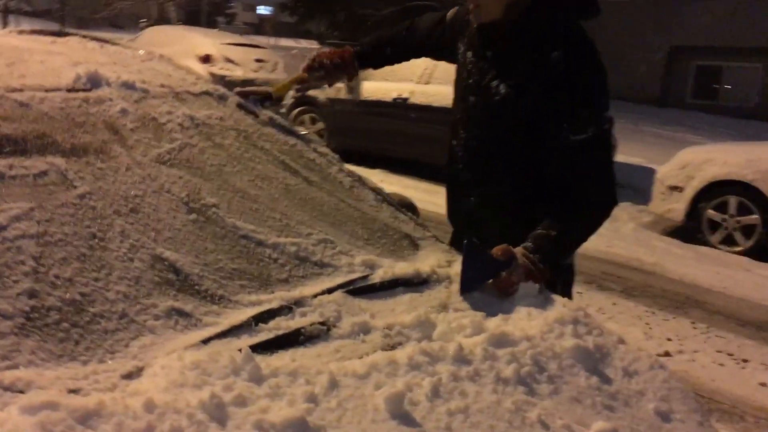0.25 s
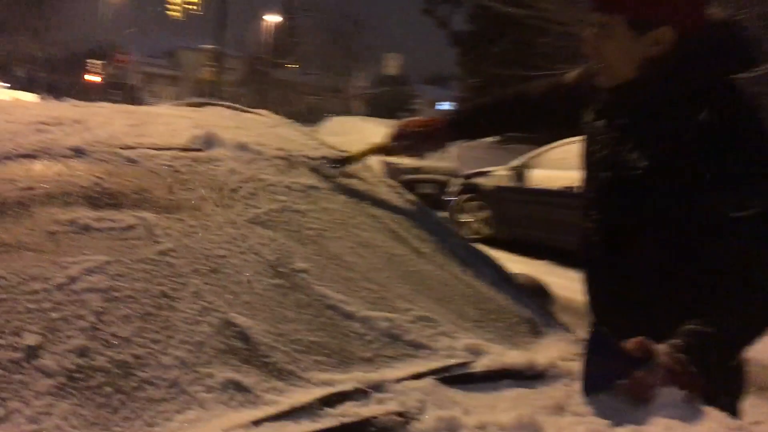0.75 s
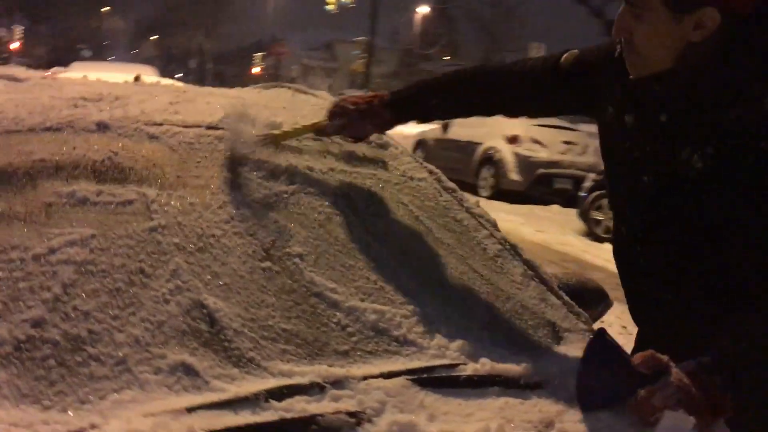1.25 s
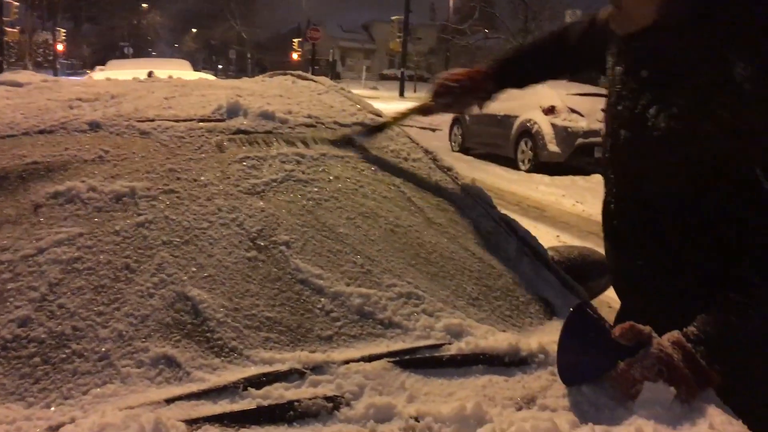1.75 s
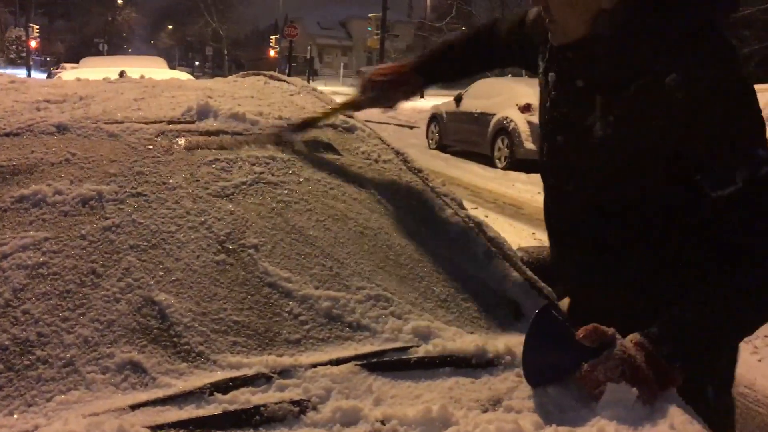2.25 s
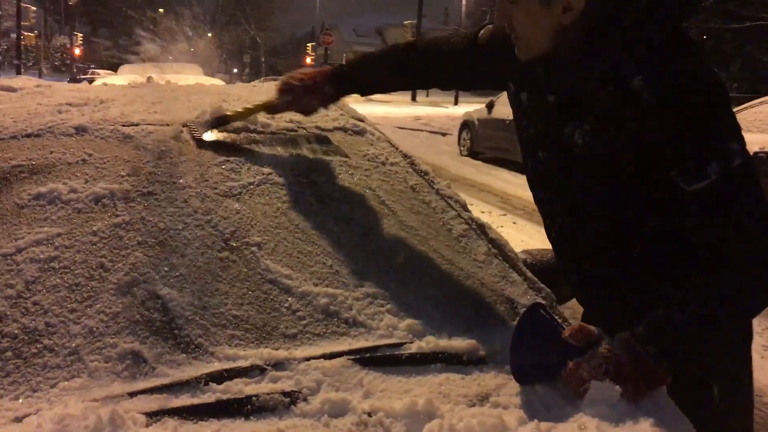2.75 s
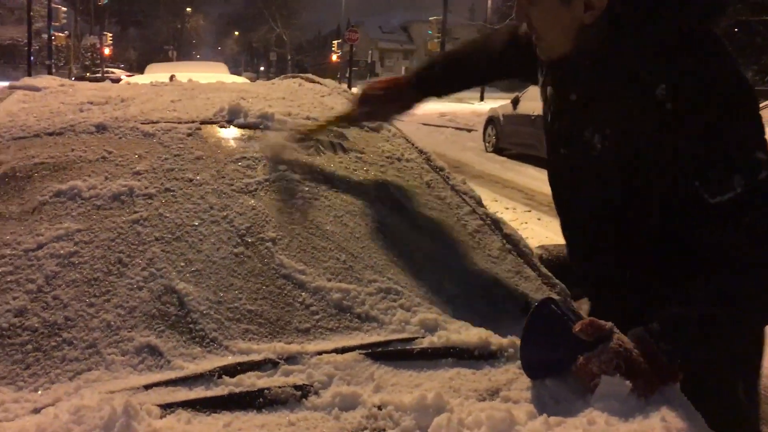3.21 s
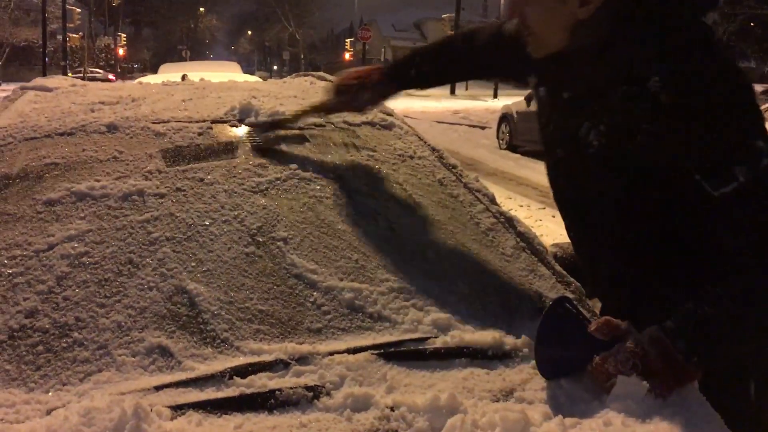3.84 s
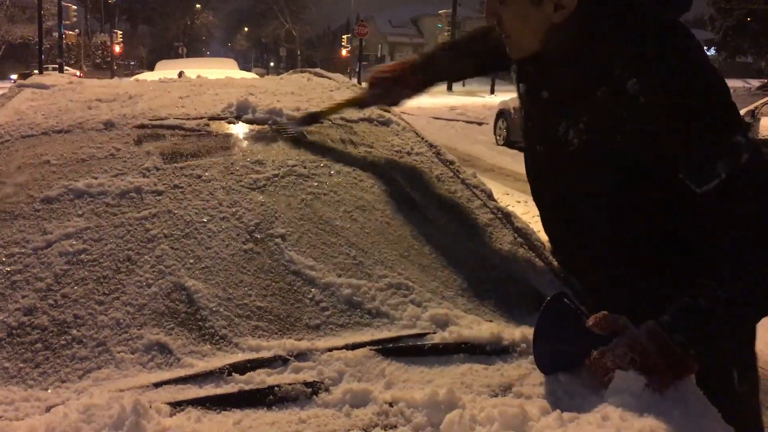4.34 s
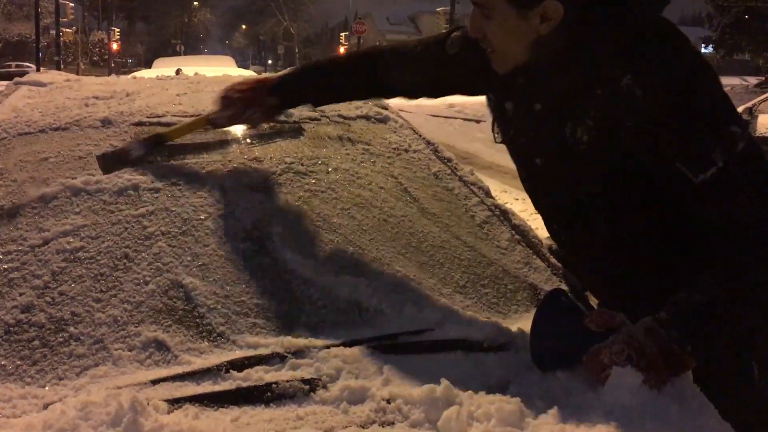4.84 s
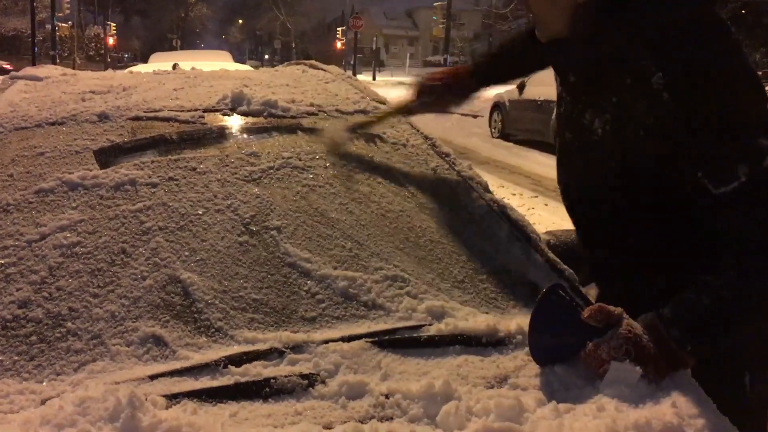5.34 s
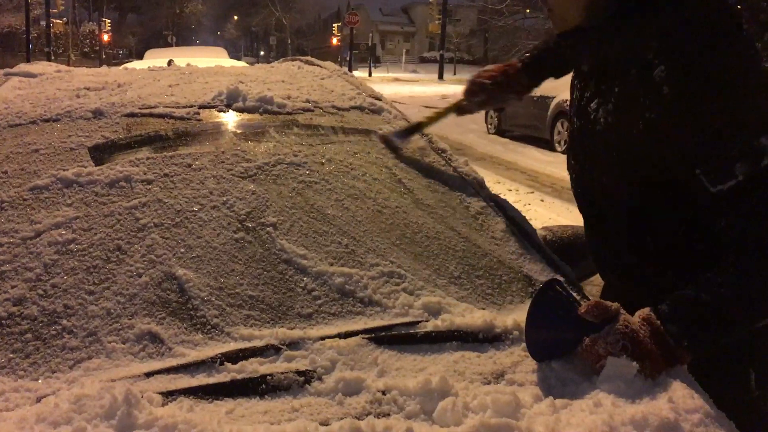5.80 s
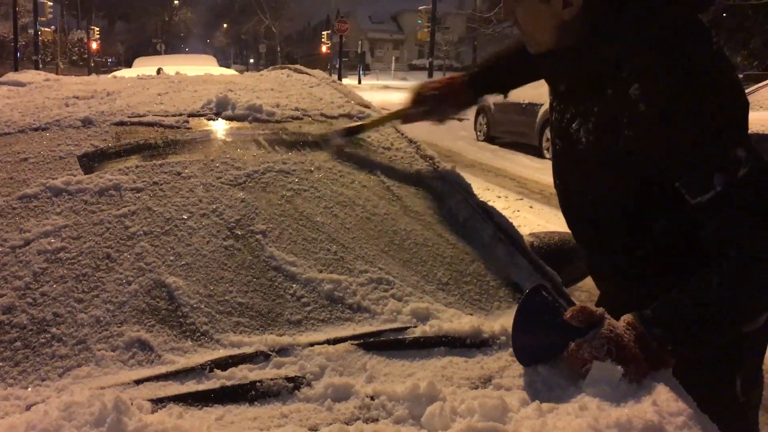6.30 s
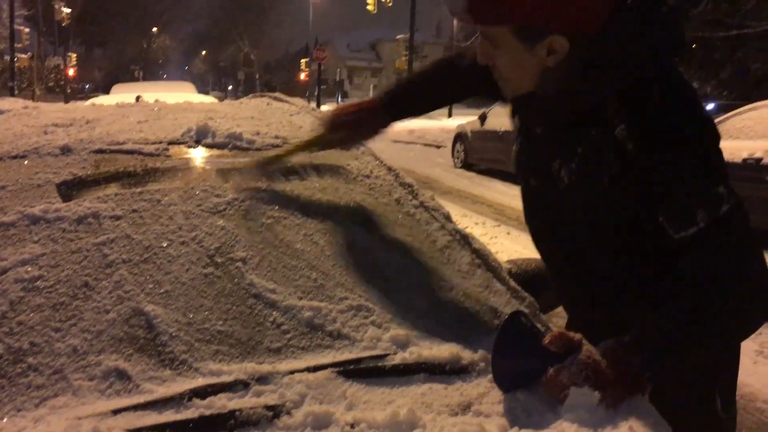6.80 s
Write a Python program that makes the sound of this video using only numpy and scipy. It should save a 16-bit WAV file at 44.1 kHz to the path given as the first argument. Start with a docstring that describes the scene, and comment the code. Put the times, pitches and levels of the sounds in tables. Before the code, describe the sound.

A hard plastic scraper rasps frost off a car windshield in quick, gritty strokes, ice crackling and chipping while the glass drums dully underneath.

```python
"""A hard, gritty scraping comes in short strokes: a plastic scraper works over an iced windscreen.
The blade sticks and slips; each slip sets off cracks in the ice, shaped by resonances of the blade, and rings a flake.
Chips snap off as short bursts of cracks; the pane rumbles in its modes, knocks, and booms when it springs back.
Behind the strokes come hisses of ice dust and loose snow, made of filtered random clicks that follow
the grinding with a lag, over a faint low street noise."""
import sys
import numpy as np
from scipy import signal
from scipy.io import wavfile
from scipy.ndimage import uniform_filter1d

SR = 44100
rng = np.random.default_rng(int(sys.argv[2]) if len(sys.argv) > 2 else 0)


def transcribe(signal):
    """Save signal, clipped to [-1, 1], as a 16-bit WAV file at the path in sys.argv[1]."""
    frames = np.atleast_2d(signal).T
    limited = np.clip(frames, -1, 1)
    pcm = np.round(limited * 32767).astype(np.int16)
    wavfile.write(sys.argv[1], SR, pcm)


N = 311346

# Loud chips snapping off and taps of the blade. Each row: crest time in seconds, relative level in dB,
# relative treble share in dB, length in seconds, ring frequency in Hz.
CHIP_EVENTS = [(0.136, -20, -6, 0.004, 4330), (0.338, -23, -14, 0.0051, 1320), (.394, -19, -2, .0046, 3500),
               (0.409, -16.5, -7, 0.0048, 3880), (.419, -16, -3, 0.0082, 3570),
               (.478, -20.5, -2, 0.0074, 4040), (0.599, -24, -12, 0.0036, 3940),
               (.655, -23.5, -13, 0.0027, 1460), (0.673, -19, -7, .0018, 3720),
               (1.005, -16, -6, .003, 3130), (1.024, -15, -3, 0.0047, 3130),
               (1.081, -12.5, -7, 0.0021, 3680), (1.155, -16, 0, .002, 3620),
               (1.182, -17.5, -3, 0.0047, 3600), (1.247, -15, -2, 0.0042, 1950),
               (1.294, -16, 4, .006, 4450), (1.436, -23, -6, .0036, 3720), (1.681, -33, -14, 0.0036, 1300),
               (1.758, -26, -7, .0034, 2200), (1.856, -15.5, -6, 0.0031, 1290),
               (1.916, -23, -16, 0.0028, 4100), (2.011, -16.5, 3, 0.0092, 3360),
               (2.283, -14.5, -9.5, 0.0038, 4500), (2.341, -23.5, -4, 0.0064, 3280),
               (2.374, -21.5, -10, 0.0031, 3160), (2.475, -26.5, -8, 0.003, 2310),
               (2.542, -17, -7, 0.0037, 4150), (2.552, -14, 1, 0.004, 2760), (2.582, -24, 2, 0.0075, 1930),
               (2.946, -12.5, -10, 0.0015, 3450), (3.035, -29, -16, 0.0011, 1090),
               (3.05, -36, -10, 0.0025, 3380), (3.133, -17, -4, 0.0015, 2150),
               (3.183, -15.5, -3, 0.0057, 3850), (3.227, -12, 3, .002, 4000),
               (3.389, -21.5, -5, 0.0048, 4730), (3.535, -35.5, -10, 0.0039, 3800),
               (3.575, -29.5, -11, 0.0039, 3690), (3.596, -28, 1, 0.0021, 4460),
               (3.623, -23, -14, 0.005, 1850), (3.645, -34, -3, 0.0087, 3600),
               (3.676, -27, -10, 0.0058, 920), (3.689, -28.5, -1, 0.0033, 4030),
               (3.72, -37, -5, 0.0056, 3320), (3.799, -36, -17, .0057, 1540),
               (3.845, -34.5, 2, 0.0021, 4630), (3.853, -33.5, -15, 0.0034, 4720),
               (3.938, -21.5, 5, 0.0097, 4340), (4.137, -32.5, 7, 0.0032, 3470),
               (4.416, -31.5, -7, 0.0031, 1270), (4.47, -37, -7, .0038, 960),
               (4.534, -24.5, -10, .0048, 1720), (4.663, -25.5, -3, 0.0048, 1020),
               (4.698, -27, -3.5, 0.0044, 4700), (4.918, -29, 1, 0.0069, 3550), (4.938, -20, 2, .004, 2460),
               (5.047, -25.5, -7.5, 0.0036, 1560), (5.077, -22, -6, 0.0034, 1480),
               (5.108, -24, -7, 0.0029, 1250), (5.276, -15.5, -6.5, .0048, 2400),
               (5.302, -17.5, -3, .0045, 2140), (5.647, -20, 3, 0.00275, 1670),
               (5.701, -20, 2, .0031, 3050), (5.855, -19.5, -13, .007, 936),
               (5.895, -21.5, -4.5, .0054, 1770), (6.013, -17.5, -5.5, .0068, 3930),
               (6.034, -18.5, 3, .005, 1614), (6.132, -21.5, -4, 0.0026, 3850),
               (6.376, -25, -15, .0023, 1100), (6.402, -20, -9, 0.0047, 1630),
               (6.418, -19.5, 3, 0.0031, 1800), (6.841, -15.5, -9.5, 0.0049, 4270),
               (6.874, -16, -2, 0.0027, 3460)]
# Spectrum of cracking ice. Each row: frequency in Hz, relative density in dB per Hz.
FRACTURE_SPECTRUM = [(450, -14), (800, 2.5), (1400, -3), (2000, 1), (2700, -1), (4000, 4), (5600, -3.5),
                     (8000, -2.5), (12000, -4), (16000, -22)]
# Spectrum of falling snow and ice dust. Each row: frequency in Hz, relative density in dB per Hz.
SNOW_SPECTRUM = [(450, 10.5), (1100, 12.5), (2000, 11.5), (3000, 13), (4300, 12), (6000, -3.5), (9000, 8.5),
                 (12000, -13), (16000, 17)]


def arm():
    """Friction grows with pressure: each stroke bears down to a crest and eases, driving ice and pane."""
    # Strokes and short drags of the blade. Each row: start in seconds, end in seconds, crest as a share of
    # the length, relative grinding level at the crest in dB, rise before it in dB, fall after it in dB,
    # relative treble share in dB, pane drumming and pane flexing in dB against the grinding,
    # wrist angle as dB of blade ring.
    strokes = [(0, 0.212, 0.41, -25, 12.5, 6.3, -6.5, -6, -10, 1),
               (0.233, 0.31, 0.55, -35, 14, 11, -9.5, -1.5, -20, -8),
               (0.317, 0.388, .2, -34, 6, 1, -6.5, 0.5, -2, 6),
               (.407, 0.622, 0.83, -24, -0.5, 10.4, -6.5, -8, -11.5, -8),
               (0.685, 0.946, 0.37, -26.5, 10, 13.3, -5.5, -5.5, -7, 10),
               (0.972, 1.076, 0.59, -24.5, 16.5, 1.3, -5.5, -4.5, -15, 6),
               (1.086, 1.339, 0.21, -22, -2.5, 10.4, -4, -7, -8.5, 1),
               (1.412, 1.701, 0.36, -23.5, 12.5, 31.6, -6, -9.5, -9.5, 3.5),
               (1.758, 1.853, .55, -40, 3, 1.8, -4.5, 3, -12, 10.5),
               (1.844, 2.063, 1, -28, -3, 5, -4.5, -7.5, -6.5, -1.5),
               (2.098, 2.32, 0.87, -24, 4, 2.5, -3, -15.5, -13.5, 5),
               (2.368, 2.42, .15, -33, 9, 11, -5, -2.5, -10, -1),
               (2.538, 2.598, 1, -20, 13, 3, -4.5, -32, -23, -3),
               (2.608, 2.734, 0.55, -20, -3, 19, -4, -13, -10, -1),
               (2.916, 2.969, 0.4, -24.5, 54, 14, -4.5, -14, -12, -5),
               (3.108, 3.389, 0.51, -19, 24, 32, -5.5, -8.5, -7.5, 2.5),
               (3.371, 3.45, .1, -42, 0, 12, -3, -19, -15, -5),
               (3.949, 4.079, 0.47, -20.5, -2, 13.7, -1.5, -19.5, -8.5, 4),
               (4.13, 4.217, .15, -41.5, -9, 1.6, 1.5, -27, -16, 8),
               (4.212, 4.247, 0.26, -25, 8, 18, 6, -23, -18, 11.5),
               (4.573, 4.594, 0.53, -22.5, 8, 20, -8, -13, -1, 1),
               (4.653, 4.711, 0.63, -35, 2.5, 4, 0, -14, -24, 6),
               (4.857, 4.885, 0.27, -35, 10, 5.3, -7.5, -20, -26, 0),
               (4.935, 4.965, 0.19, -18, 6, 25, -1.5, -39, -22, 1),
               (5.141, 5.232, 0.69, -32.5, -2, 15, -5.5, -3, -10, 7.5),
               (5.256, 5.515, 0.46, -22, 8.5, 23.3, -5, -3, -9, -2),
               (5.525, 5.8, .35, -22.5, 18, 8.4, -3, -13, -8.5, 10.5),
               (5.83, 6.069, 1, -34.5, -1.5, 9, -5, -1, -2.5, -4),
               (6.096, 6.273, 0.64, -28.5, 10, 4.9, -5.5, -4, -5, 10),
               (6.295, 6.487, 0.85, -34.5, 4.5, 17, -6, 1.5, -2, 5.5),
               (6.514, 6.705, 0.49, -29, 11.5, 11, -7, -9, -2.5, 9.5),
               (6.725, 6.895, 0.87, -23, 11, 31, -4.5, -5, -6.5, 2)]
    bend = 1.51  # of the rise and the fall; 1 is a straight ramp in dB
    brightens = 0.16  # dB of treble share per dB of pressure
    drum_follows, flex_follows = 0.81, 0.72  # share of the pressure change in dB that the pane follows
    flex_build_db = 1.5  # the pane flexes more towards the end of a stroke
    frost_db, frost_patches_per_s = .9, 44  # uneven thickness of the frost
    flex_lag_s = 0.016  # the whole pane follows the blade this slowly
    edge_s = 0.0094  # the blade bites and lifts this fast

    grind, treble_db, drum, flex, wrist_db = np.zeros((5, N))
    for start, end, crest, db, rise_db, fall_db, bright_db, drum_db, flex_db, angle_db in strokes:
        at = np.arange(max(int(start * SR), 0), min(int(end * SR), N))
        way = np.linspace(0, 1, len(at))
        crest = np.clip(crest, .05, .95)
        before = np.maximum(1 - way / crest, 0)
        after = np.maximum((way - crest) / (1 - crest), 0)
        pressure_db = -rise_db * before ** bend - fall_db * after ** bend
        grind[at] = from_db(db + pressure_db)
        drum[at] = from_db(db + drum_db + drum_follows * pressure_db)
        build_db = flex_build_db * (way - 1.0)
        flex[at] = from_db(db + flex_db + flex_follows * pressure_db + build_db)
        treble_db[at] = bright_db + brightens * (pressure_db - pressure_db.mean())
        wrist_db[at] = angle_db
    grind = grind * from_db(frost_db * drift(frost_patches_per_s))
    controls = grind, treble_db, drum, lagging(flex, flex_lag_s), wrist_db
    return [uniform_filter1d(control, max(int(edge_s * SR), 2)) for control in controls]


def slip_train(per_s, unevenness, spread_db):
    """Stick-slip: impulses at uneven intervals (median 1 / per_s), each with another force."""
    gap, force = rng.standard_normal((2000, 2)).T
    at = (np.cumsum(np.exp(unevenness * gap)) * SR / per_s).astype(int)
    train = np.zeros(N)
    train[at[at < N]] = from_db(spread_db * np.clip(force, -2, 1.5))[at < N]
    return train


def crumble(slips, rise_s, colour_db, drag):
    """Avalanche: each slip releases a short swell of cracks, over the even drag of the edge."""
    at = np.flatnonzero(slips)
    forces = np.zeros(N)
    forces[at] = slips[at] * from_db(colour_db * rng.standard_normal(len(at)))
    # Two equal real poles: the response rises for rise_s, then dies away.
    r = np.exp(-1 / (rise_s * SR))
    avalanches = signal.lfilter([1], [1, -2 * r, r * r], forces + 1e-18)
    return rms_one(avalanches) + drag


def scraping(slips, grind, treble_db):
    """Brittle fracture as dense random cracks; slips and frost patches vary separately in each band."""
    out = np.zeros(N)
    cracks = [grains(per_s=9000, spread_db=-1.0) for _ in range(2)]
    for k, (low, high, gain) in enumerate(bands(FRACTURE_SPECTRUM, count=20)):
        bursts = evened(crumble(slips, rise_s=.0013, colour_db=3.0, drag=.7), span_s=.025)
        patches = from_db(1.7 * drift(35))
        colour = gain * patches * tilt(treble_db + 3.5, np.sqrt(low * high), slope=1.0)
        out += band(cracks[k % 2] * bursts * grind * colour, low, high)
    return from_db(-1.49) * out


def flaking(slips, grind):
    """Size sets pitch: each slip rings a flake of ice, and smaller flakes ring higher, shorter and louder."""
    pitches_hz = np.geomspace(1200, 5000, num=28)
    at = np.flatnonzero(slips)
    out = np.zeros(N)
    for i, hz, luck in zip(at, rng.choice(pitches_hz, len(at)), rng.standard_normal(len(at))):
        size = np.sqrt(2500 / hz)  # 1 for a flake that rings at 2500 Hz
        strength = from_db(4 * min(luck, 1.6)) / size
        add(out, i / SR, strength * ring(hz, rise_s=.002 * size))
    return from_db(-10) * grind * rms_one(out)


def chipping(colour_db, bass_linger):
    """Fracture bursts: a chip cracks for milliseconds, longer in the bass, and rings as it breaks away."""
    out = np.zeros(N)
    cracks = [grains(per_s=16000, spread_db=1.5) for _ in range(2)]
    crumbs = crumbling(count=4)
    for k, (low, high, gain) in enumerate(bands(FRACTURE_SPECTRUM, count=16)):
        hz = np.sqrt(low * high)
        bursts = crumbs * from_db(2.6 * drift(45))
        lucks = rng.standard_normal(len(CHIP_EVENTS))
        for (s, db, treble_db, length_s, _), luck in zip(CHIP_EVENTS, lucks):
            strength = from_db(db + colour_db * luck) * tilt(treble_db + 5.0, hz, slope=1.0)
            rise_s = 0.81 * length_s
            burst = swell(rise_s * (4000 / hz) ** bass_linger) ** 2
            add(bursts, s - rise_s, strength * burst)
        out += gain * band(cracks[k % 2] * bursts, low, high)
    for s, db, _, length_s, ring_hz in CHIP_EVENTS:
        add(out, s - length_s / 2, from_db(db - 1) * ring(ring_hz, rise_s=length_s / 2))
    return from_db(-4.0) * out


def crumbling(count):
    """Secondary fracture: level of the few small crumbs that give way at random around each chip."""
    level_db, spread_db, scatter_s, rise_s = -44, 3, 0.028, 0.0016
    out = np.zeros(N)
    for (s, *_), draws in zip(CHIP_EVENTS, rng.standard_normal((len(CHIP_EVENTS), count, 2))):
        for when, luck in draws:
            strength = from_db(level_db + spread_db * min(luck, 1.5))
            add(out, s + scatter_s * when, strength * swell(rise_s) ** 2)
    return out


def tilt(brighter_db, hz, slope):
    """Spectral tilt: hard ice breaks brighter, soft frost duller, pivoting about 5 kHz."""
    return from_db(slope * np.clip(brighter_db, -6, 5) * np.tanh(np.log2(hz / 5000)))


def blade(x, wrist_db):
    """Modal filtering: the scraper colours every crack, and its bending modes shift as the wrist turns."""
    # Bending modes of the blade. Each row: frequency in Hz, width in Hz, gain in dB before the shifts.
    bending = [(1520, 324, 2.5), (3190, 220, -0.5), (4120, 430, 5)]
    # Resonances of the edge. Each row: frequency in Hz, width in Hz, gain in dB.
    edge_modes = [(7190, 160, 4.5), (8760, 860, 3.5), (10480, 1600, -5.5), (11850, 1250, 4.5),
                  (14740, 1000, 13)]
    # Slow shift of the highest bending mode. Each row: time in seconds, shift in dB.
    top_ring = [(.1, -4.5), (.45, 1), (.8, -3.5), (1.15, -0.5), (1.55, -2), (2.55, -4.5), (2.66, -0.5),
                (3.2, -3.5), (5.65, -6.5), (6.15, 0), (6.85, -6)]
    # How strongly the two lower bending modes follow the wrist angle: one share for each [ratio].
    wrist_shares = [0.57, 0.86]
    wobble_db, wobbles_per_s = 2.0, 14

    shifts_db = [share * wrist_db for share in wrist_shares]
    shifts_db.append(np.interp(np.arange(N) / SR, *np.transpose(top_ring)))
    for (hz, width_hz, db), shift_db in zip(bending, shifts_db):
        gain = from_db(db + shift_db + wobble_db * drift(wobbles_per_s))
        x = x + (gain - 1) * resonate(x, hz, width_hz)
    for hz, width_hz, db in edge_modes:
        x = x + (from_db(db) - 1) * resonate(x, hz, width_hz)
    return from_db(-2.0) * x


def pane(slips, modes):
    """Forced vibration: noise bursts at the slips shake the glass in its modes, with slow level about 1."""
    force = rng.standard_normal(N) * crumble(slips, rise_s=0.00088, colour_db=5.5, drag=0.67)
    shaking = np.zeros(N)
    for k, (hz, width_hz, db) in enumerate(modes):
        shaking += (-1) ** k * from_db(db) * resonate(force, hz, width_hz)  # signs alternate
    return evened(shaking, span_s=0.034)


def jolts():
    """Impact coupling: level of the shaking that each chip passes to the pane, in proportion to its own."""
    out = np.zeros(N)
    for s, db, *_ in CHIP_EVENTS:
        add(out, s, from_db(db) * swell(rise_s=0.0078))
    return out


def blows():
    """Damped free vibration: deep booms of the whole pane and short knocks against ridges of ice."""
    # The pane springs back as the load changes. Each row: start in seconds, relative level in dB,
    # frequency in Hz.
    booms = [(1.301, -21.5, 131), (1.446, -19.5, 121), (2.048, -21, 131), (2.107, -23, 119),
             (2.164, -22.5, 130), (2.227, -19, 115), (2.274, -29, 123), (2.703, -16.5, 128),
             (2.946, -24.5, 115), (3.322, -26, 112), (3.39, -35, 132), (3.631, -30.5, 119),
             (4.232, -22, 111), (4.533, -37, 120), (4.59, -20.5, 120), (4.955, -26.5, 125),
             (5.43, -21, 114), (6.054, -30, 110), (6.886, -24, 119)]
    # The blade rams a ridge of ice. Each row: start in seconds, relative level in dB.
    knocks = [(0.408, -17), (0.417, -11), (0.428, -13), (0.451, -15.5), (0.461, -18), (0.487, -21)]
    out = np.zeros(N)
    for s, db, hz in booms:
        add(out, s, from_db(db - 2.0) * ring(hz, rise_s=0.011))
        add(out, s, from_db(db - 23.5) * ring(64.5, rise_s=0.035))
    for s, db in knocks:
        add(out, s, from_db(db - 5.5) * ring(514, rise_s=0.0013))
    return out


def spray(grind):
    """Many small impacts: ice dust patters on the glass, its level lagging the grinding."""
    dust = coloured(SNOW_SPECTRUM, grains(per_s=5000, spread_db=3.0))
    return from_db(-17) * lagging(grind, lag_s=.018) * dust


def loose_snow(grind):
    """Granular flow: powder stirred by each stroke hisses unevenly, with coarser crumbs ticking in it."""
    rest_db, stirred_db, settle_s = -60.5, -24, 0.092  # level at rest; share of the grinding; die-down
    level = from_db(rest_db) + from_db(stirred_db) * lagging(grind, settle_s)
    powder = coloured(SNOW_SPECTRUM, grains(per_s=7000, spread_db=3.5)) * from_db(2 * drift(55))
    crumb_train = slip_train(per_s=35, unevenness=.8, spread_db=6)
    falls = crumble(crumb_train, rise_s=.001, colour_db=2, drag=0)
    crumbs = falls * rms_one(band(rng.standard_normal(N), 1000, 22000))
    return level * (powder + from_db(-8) * crumbs)


def quiet_street():
    """Broadband background: steady noise with most of its power in the bass."""
    # Spectrum of the street. Each row: frequency in Hz, relative density in dB per Hz.
    street_spectrum = [(25, -29), (45, 6), (70, 1), (130, 4.5), (200, -16.5), (320, -8.5), (500, -45),
                       (1500, -67), (4000, -107)]
    return from_db(-50) * coloured(street_spectrum, rng.standard_normal(N))


def ears(mid):
    """Decorrelation: only the treble differs between the two channels, and it does so at random."""
    treble = signal.ellip(8, .5, 70, 4200, "high", fs=SR, output="sos")
    wander = rms_one(band(rng.standard_normal(N), 100, 500))
    side = from_db(-12.5) * signal.sosfilt(treble, band(mid, 4000, 17000) * wander)
    return np.array([mid + side, mid - side])


def grains(per_s, spread_db):
    """Random point process: tiny clicks of random sign and uneven size, rms 1."""
    sizes = from_db(spread_db * np.minimum(rng.exponential(1, N), 4)) * rng.choice([-1, 1], N)
    return rms_one(sizes * (rng.random(N) < per_s / SR))


def swell(rise_s):
    """Critically damped envelope: it peaks at 1 after rise_s and dies away."""
    rise = max(rise_s * SR, 2)
    age = np.arange(10 * int(rise)) / rise
    return age * np.exp(1 - age)


def ring(hz, rise_s):
    """Heavily damped vibration: a sine that builds up and dies away."""
    shape = swell(rise_s)
    return shape * np.sin(2 * np.pi * hz * np.arange(len(shape)) / SR)


def resonate(x, hz, width_hz):
    """Damped resonator: one mode as a two-pole filter, gain about 1 at its peak."""
    r = np.exp(-np.pi * width_hz / SR)
    feedback = [1, -2 * r * np.cos(2 * np.pi * hz / SR), r * r]
    return signal.lfilter(np.array([1, 0, -1]) * (1 - r * r) / 2, feedback, x + 1e-18)


def lagging(x, lag_s):
    """First-order relaxation: a level that follows x with the time constant lag_s."""
    r = np.exp(-1 / (lag_s * SR))
    return signal.lfilter([1 - r], [1, -r], x + 1e-18)


def drift(rate):
    """Slow random fluctuation: straight lines between chance values, rate values a second, rms 1."""
    knots = rng.standard_normal(int(8 * rate) + 2)
    position = np.arange(N) / SR * rate + rng.random()
    return rms_one(np.interp(position, np.arange(len(knots)), knots))


def bands(spectrum, count):
    """Band analysis: rows (low Hz, high Hz, gain) that shape white noise while keeping its power."""
    hz, db = np.transpose(spectrum)
    edges = np.geomspace(hz[0], hz[-1], count + 1)
    log_centres = np.log(edges[:-1] * edges[1:]) / 2
    gains = from_db(np.interp(log_centres, np.log(hz), db))
    power = np.sum(gains ** 2 * np.diff(edges)) * 2 / SR
    return zip(edges, edges[1:], gains / np.sqrt(power))


def coloured(spectrum, x):
    """Spectral shaping: a white source summed from weighted bands, rms 1."""
    out = np.zeros(N)
    for k, (low, high, gain) in enumerate(bands(spectrum, count=11)):
        # Thirds of a second apart, neighbouring bands do not click together.
        out += gain * band(np.roll(x, k * SR // 3), low, high)
    return rms_one(out)


def band(x, low_hz, high_hz):
    """Band-pass filtering: keep only the range between two frequencies."""
    edges_hz = [low_hz, min(high_hz, .45 * SR)]
    return signal.sosfilt(signal.butter(2, edges_hz, "band", fs=SR, output="sos"), x + 1e-18)


def evened(x, span_s):
    """Level normalisation: the same texture with its slow rms level brought to about 1."""
    size = max(int(span_s * SR), 2)
    power = uniform_filter1d(uniform_filter1d(x * x, size), size)
    return x / np.sqrt(np.abs(power) + 1e-12)


def rms_one(x):
    """Normalisation to unit mean power."""
    return x / np.sqrt(np.mean(x ** 2) + 1e-20)


def from_db(db):
    """Logarithmic level: decibels to an amplitude factor."""
    return 10 ** (np.asarray(db) / 20)


def add(out, s, sound):
    """Superposition: mix a sound in from time s in seconds."""
    start = int(np.clip(s * SR, 0, N - 1))
    out[start:start + len(sound)] += sound[:N - start]


def scene():
    """Common excitation: one train of slips drives both the ice under the blade and the pane beneath."""
    # Lower modes of the pane, flexing. Each row: frequency in Hz, width in Hz, relative level in dB.
    flex_modes = [(67.3, 9, 0), (95, 38, 0), (132.8, 21.3, 8)]
    # Higher modes of the pane, drumming. Each row: frequency in Hz, width in Hz, relative level in dB.
    drum_modes = [(186, 17.6, 7.5), (322.5, 27, 9), (464, 43, -3), (726, 1300, -9.5)]
    grind, treble_db, drum, flex, wrist_db = arm()
    slips = slip_train(per_s=150, unevenness=.55, spread_db=2.0)

    cracking = scraping(slips, grind, treble_db) + flaking(slips, grind)
    cracking += chipping(colour_db=2.5, bass_linger=0.053)
    ice = blade(cracking, wrist_db)

    jolt = jolts()
    drum = np.hypot(drum, from_db(-21.5) * jolt)  # powers add
    flex = np.hypot(flex, from_db(-24.5) * jolt)
    drumming = from_db(-4.0) * drum * pane(slips, drum_modes)
    flexing = from_db(-2.5) * flex * pane(slips, flex_modes)
    glass = drumming + flexing + blows()
    return ears(ice + glass + spray(grind) + loose_snow(grind) + quiet_street())


def record(dry):
    """Low-pass filtering: the top is cut steeply above 16.1 kHz."""
    return signal.sosfilt(signal.ellip(10, .3, 80, 16100, fs=SR, output="sos"), dry)


dry = scene()
out = record(dry)
transcribe(out)
```